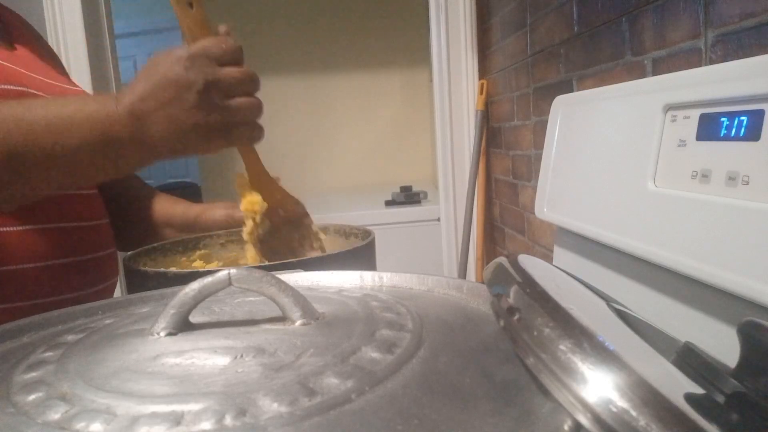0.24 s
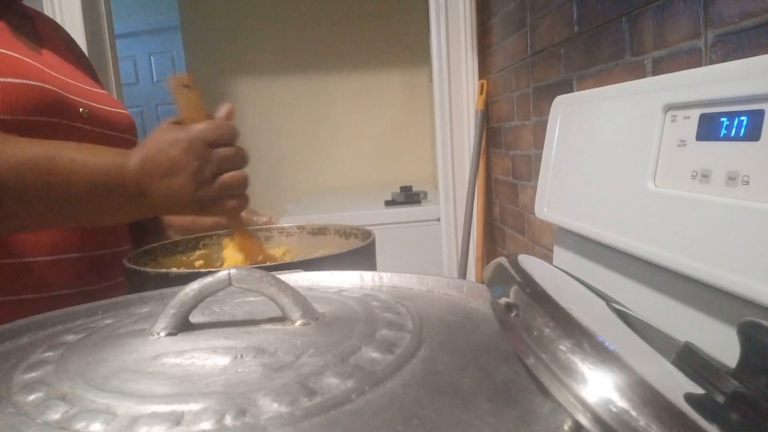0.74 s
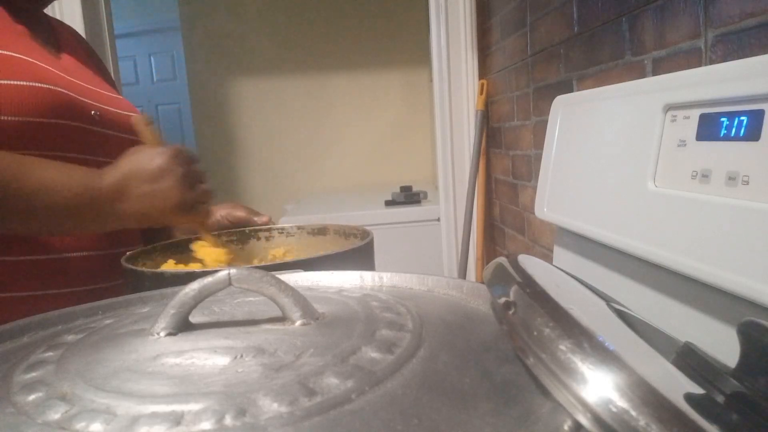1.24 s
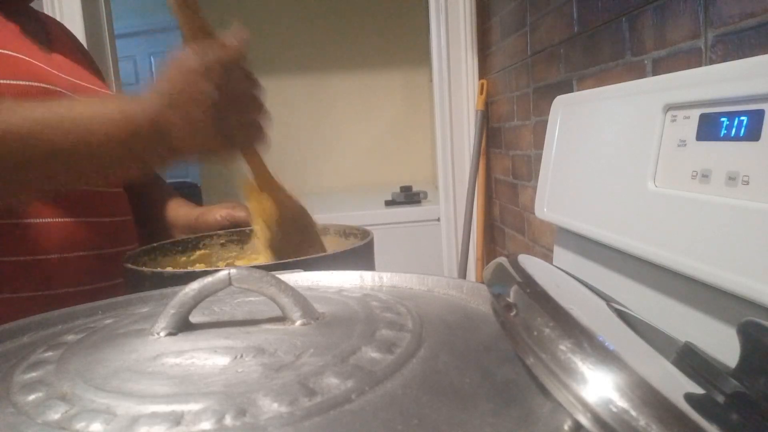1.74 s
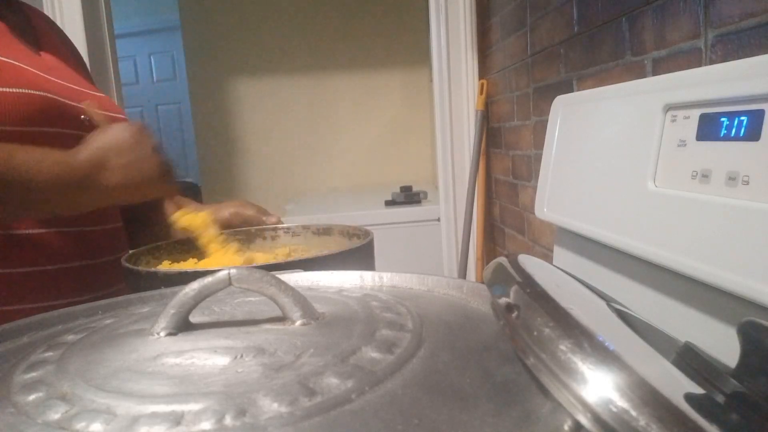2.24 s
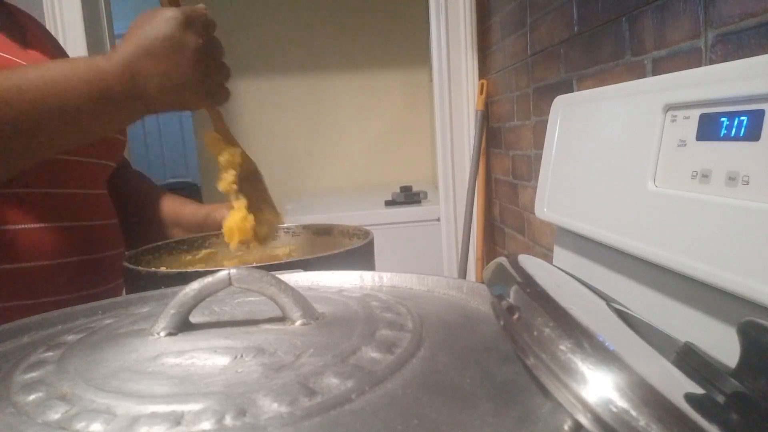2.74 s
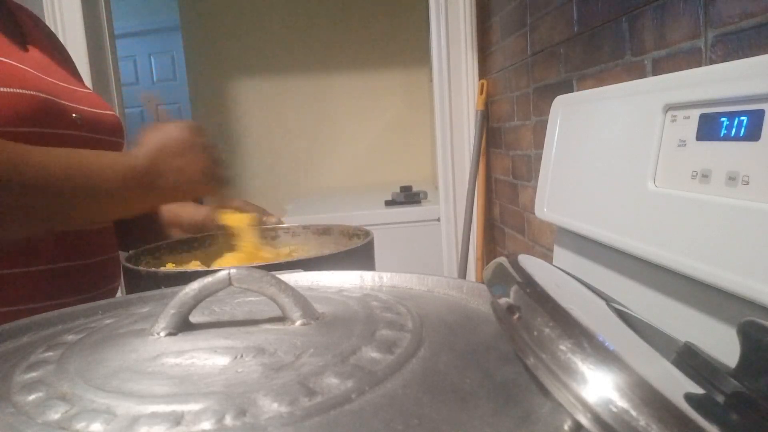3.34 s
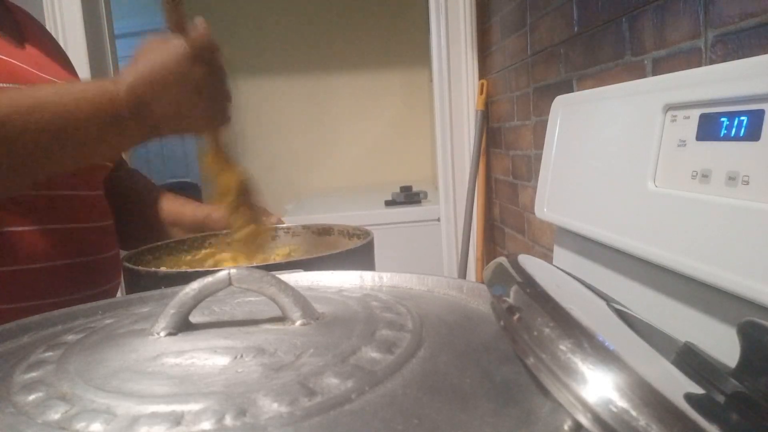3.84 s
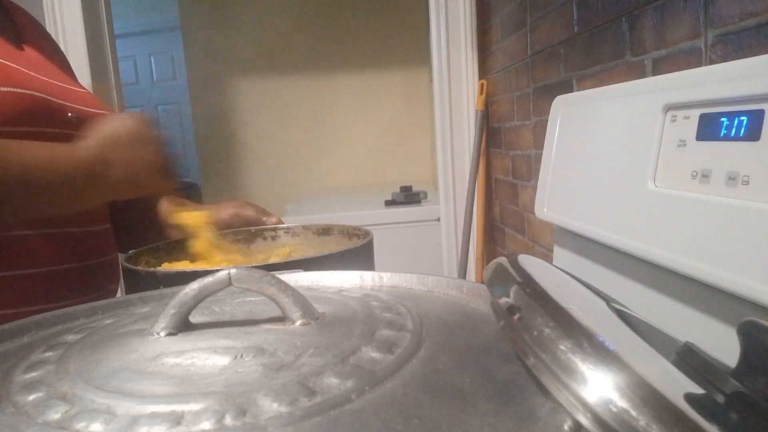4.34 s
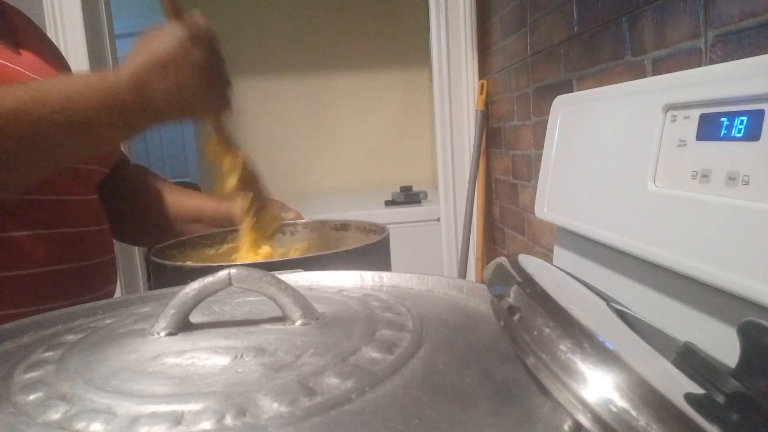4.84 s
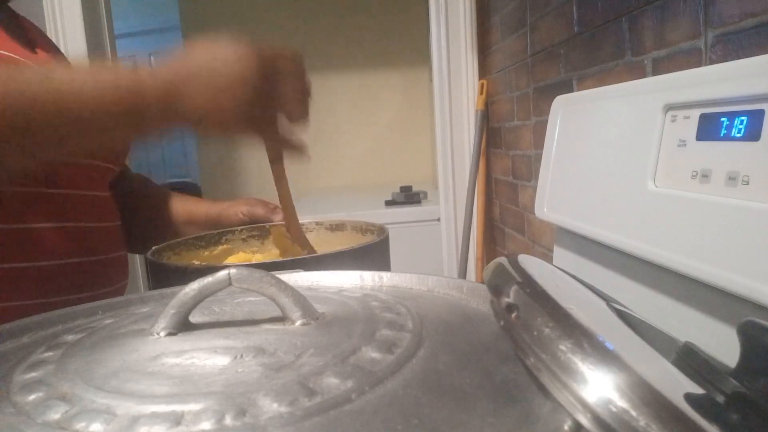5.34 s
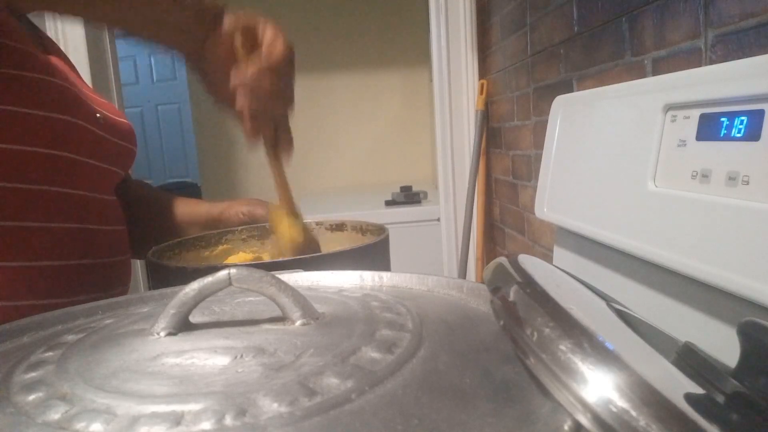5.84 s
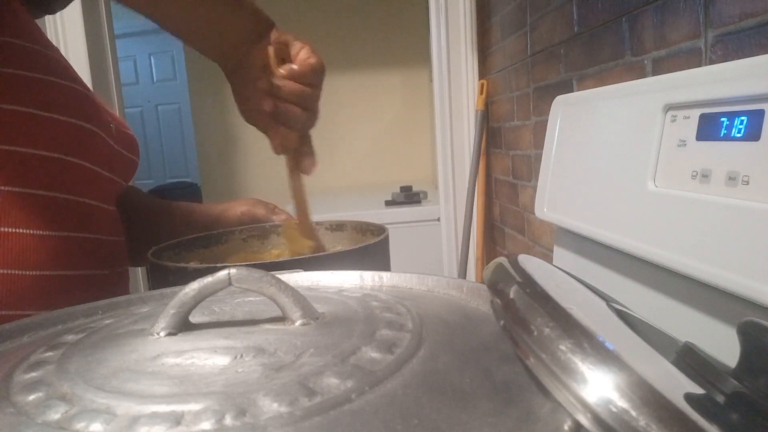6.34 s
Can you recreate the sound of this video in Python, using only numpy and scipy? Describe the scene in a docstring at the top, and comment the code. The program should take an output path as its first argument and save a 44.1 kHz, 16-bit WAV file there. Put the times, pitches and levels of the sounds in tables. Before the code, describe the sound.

A wooden spoon scrapes and knocks in a metal pot of thick cornmeal, with wet slides, dull stove thumps and a faint fan hum.

```python
"""Stirring thick cornmeal

A wooden spoon turns thick cornmeal in a metal pot on a kitchen stove, near a phone with two microphones.
Knocks are bursts of noise that ring the pot; strokes are swelling noise: a rub through the pot, a scrape
and a wet slide. Treble background noise opens up with the sounds, as a phone's noise suppressor lets it through.
Wet wood squeaks, and pushes make the stove boom, both as unsteady tones.
A fan hums in wavering tones and air noise stays steady in the small hard room."""
import sys
import numpy as np
from scipy import signal
from scipy.fft import rfft, irfft
from scipy.io import wavfile
from scipy.ndimage import uniform_filter1d

SR = 44100
rng = np.random.default_rng(int(sys.argv[2]) if len(sys.argv) > 2 else 0)


def ratio_of_db(decibels):
    """Turn decibels (scalar or array-like) into linear amplitude factors; 0 dB maps to 1."""
    return 10 ** (np.asarray(decibels, float) / 20)


def unload_audio(sound):
    """Save the sound as a 16-bit wav file, at the path given as the first command line argument."""
    columns = np.transpose(np.atleast_2d(sound))
    # keep every value between -1 and 1, then stretch to whole-number steps
    steps = np.round(np.clip(columns, -1, 1) * 32767)
    wavfile.write(sys.argv[1], SR, steps.astype(np.int16))


N = 290178  # length in samples

# All levels are relative. The times to rise or fall are the seconds taken for 20 dB.
# The fan's hum. Each row: pitch in Hz, waver of the pitch in Hz, level in dB.
FAN_TONES = [(182.8, 3, -66), (271, 9, -77), (386, 4.05, -70), (484, 6, -73), (535, 7, -81.5),
             (785, 6.7, -73), (1028, 8, -83.5), (1220, 8, -87)]
# Colour of the air noise. Each row: frequency in Hz, level in dB per Hz.
AIR_COLOUR = [(18, -54.5), (30, -23.5), (189, 8), (311, -4), (364, -1), (526, -12), (649, -27.5),
              (760, -12.5), (889, -30), (1220, -17), (1460, -25), (5170, -44), (6550, -28.5),
              (16000, -42.5)]
AIR_DB = -62

# What the pot rings with. Each row: pitch in Hz, level in dB, time to fade by 60 dB in seconds.
POT_MODES = [(220.8, -7.5, 0.15), (282.3, -12, 0.12), (331.8, -6, 0.19), (414.8, 8, 0.043),
             (450.3, -12, 0.12), (523.4, 2.5, 0.08), (568, 1, 0.039), (661, -8, 0.049), (740.5, -7, 0.14),
             (848, -5.5, 0.009), (1043, -10, 0.031), (1163, -12, 0.024), (1234, 7.5, 0.0099),
             (1333, 5, 0.014), (1512, 4, 0.0295), (1715, -4, 0.021), (2012, 3, 0.014), (2240, -9.5, 0.0043),
             (2570, -12.5, 0.011)]
LOW, MIDDLE, HIGH, RASPING = POT_MODES[:5], POT_MODES[5:10], POT_MODES[10:], POT_MODES[16:18]

# The spoon edge scrapes the bottom. Each row: peak in seconds, rise in seconds, fall in seconds,
# level in dB, centre of its colour in Hz.
SCRAPE_STROKES = [(0.0, .05, 0.051, -70, 2660), (.26, 0.1, 0.22, -65, 2360), (.46, .08, .4, -70, 2200),
                  (.64, .4, 0.18, -68.5, 2120), (.74, 0.18, .2, -64.5, 3100),
                  (.85, 0.17, 0.13, -59.5, 3200), (1.17, 0.065, 0.41, -77.5, 2430),
                  (1.45, 0.033, 0.078, -65, 3260), (1.59, 0.18, 0.076, -70.5, 2100),
                  (1.94, 0.052, 0.29, -59, 2160), (2.69, 0.13, .2, -68.5, 2155),
                  (3.371, .4, 0.85, -77, 2270), (3.789, 0.045, 0.082, -70, 2060),
                  (3.901, 0.046, 0.078, -63, 3050), (4.329, .18, 0.17, -78, 2240),
                  (4.66, 0.035, 0.27, -64, 2100), (4.74, 0.11, 0.27, -60, 2020),
                  (4.83, 0.089, .07, -52, 2400), (5.02, 0.12, 0.26, -67.5, 2034),
                  (5.88, .3, 0.24, -75, 2150), (6.2, 0.25, 1, -76, 2400)]
# Colour of the scrape. Each row: frequency as a multiple of the centre, level in dB per Hz.
SCRAPE_COLOUR = [(.4, -32), (.8, 4.5), (1.001, 2), (1.25, -1), (2.2, -7.5), (4.001, -17)]
# Wet slides, and the treble background that opens up with them. Each row: peak in seconds,
# rise in seconds, fall in seconds, slide level in dB, background level in dB.
TREBLE_SWELLS = [(0.0, .05, 0.11, -68, -63.5), (.26, .14, 0.37, -71.5, -63), (.66, .5, .3, -81, -71),
                 (.93, .25, 0.17, -70, -67), (1.13, 0.061, 0.2, -72.5, -73.5), (1.3, .3, 0.25, -76, -82),
                 (1.5, 0.095, 0.16, -68, -64.5), (2.07, 0.12, 0.78, -73, -73.5), (2.38, 1, 0.18, -77, -72),
                 (2.69, 0.12, 0.23, -64.5, -61), (3.3, 0.15, 0.22, -69, -65.5), (3.55, 0.69, .4, -75, -75),
                 (3.8, 0.064, 0.25, -77.5, -70), (3.899, 0.04, 0.081, -63.5, -60.5),
                 (4.2, 0.1, 0.25, -77, -81.5), (4.341, 0.49, 0.24, -75.5, -68.5),
                 (4.7, 0.075, 0.22, -61.5, -61), (4.8, 0.22, 0.046, -62, -68), (4.9, .05, 0.19, -57.5, -68),
                 (5.05, 0.34, 0.71, -67.5, -63.5), (5.45, 0.8, 0.62, -73, -75.5),
                 (5.88, 0.14, 0.19, -78, -67.5), (6.36, 0.47, .4, -67, -67), (6.56, .2, .3, -82, -77)]
# Colour of the wet slide. Each row: frequency in Hz, level in dB per Hz.
SLIDE_COLOUR = [(2600, -19), (4000, -2), (5000, 0), (6000, -3), (8000, -21)]
# Colour of the treble background noise. Each row: frequency in Hz, level in dB per Hz.
BACKGROUND_COLOUR = [(4500, -28), (6800, -6), (9000, -7.5), (12500, -3.5), (13600, -7.5), (16000, -18)]
# How hard the spoon drags the pot. Each row: time in seconds, level in dB.
DRAG_FORCE = [(0, -64.5), (.14, -70), (.5, -70.5), (1.0, -64), (1.08, -67), (1.27, -58.5), (1.68, -69),
              (2.36, -63.5), (2.53, -64), (3.1, -71), (3.3, -47), (3.5, -65), (4.2, -65.5), (4.55, -61),
              (5.0, -58.5), (5.5, -68), (5.75, -63.5), (6.58, -67)]
SCRAPE_REST_DB, TREBLE_REST_DB, RUB_OVER_SCRAPE_DB = -99, -111, 2
# after a knock the pot keeps shuffling on the burner; its level is relative to the knock
SHUFFLE_DB, SHUFFLE_LATE_S, SHUFFLE_RISE_S, SHUFFLE_FALL_S = -22.5, 0.041, 0.088, 0.17

# Wet wood squeaks on metal. Each row: start in seconds, length in seconds, pitch in Hz, level in dB,
# pitch wobble as a share of the pitch.
WOOD_SQUEAKS = [(.185, .06, 2480, -63, .03), (.195, .05, 2150, -64, .03), (.422, .03, 5400, -69, .025),
                (4.63, .075, 5550, -68, .02), (5.075, .07, 12700, -70, .008), (5.08, .05, 11700, -70, .008),
                (5.115, .05, 9700, -69, .015), (5.225, .04, 12400, -66, .008),
                (5.36, .065, 12100, -65, .004), (5.399, .035, 4180, -60, .007),
                (5.416, .036, 5060, -61, .008), (5.432, .03, 4080, -66, .015),
                (5.438, .036, 4680, -60, .007), (5.461, .028, 4070, -57, .005),
                (5.49, .017, 4120, -56, .005), (5.505, .04, 4130, -66, .012), (6.5, .07, 10400, -69, .012)]
SQUEAK_CLIMB, SQUEAK_FLUTTER_DB = 2.5, 3.0  # the climb is counted in wobbles per squeak

# Knocks on the pot. Each row: start in seconds, pot body level in dB, pot wall level in dB,
# tick level in dB, basic chatter time to fade by 60 dB in seconds.
POT_KNOCKS = [(0.213, -72, -75, -69, 0.11), (0.426, -46.5, -62, -94, 0.2), (0.635, -52, -84, -83, 0.23),
              (0.784, -63, -55, -71, 0.12), (0.851, -47.5, -65, -68, 0.12), (0.924, -62, -58.5, -82, 0.093),
              (0.943, -69, -72, -62, 0.08), (1.101, -70, -90, -65, 0.27), (1.367, -44.5, -63, -84, 0.097),
              (1.425, -44, -63, -95, 0.16), (1.473, -54, -54.5, -53, 0.055), (1.892, -31, -34, -51, 0.064),
              (1.906, -21.5, -31.5, -51, 0.061), (1.93, -53, -35, -53.5, 0.12),
              (2.187, -43, -65.5, -80, 0.13), (2.376, -77, -81, -62.5, 0.092),
              (2.507, -36.5, -69.5, -104, 0.1), (2.529, -42, -73, -93, 0.076),
              (2.61, -38.5, -60, -78, 0.082), (2.632, -66, -52, -69, .12),
              (2.656, -43.5, -52.5, -75, 0.096), (2.692, -37, -47.5, -99, 0.081),
              (2.811, -47, -57.5, -90, 0.049), (3.193, -33.5, -36.5, -46.5, 0.15),
              (3.211, -23.5, -36.5, -58, .1), (3.228, -45, -33.5, -55, 0.19),
              (3.285, -47, -37.5, -57, .052), (3.343, -64, -43.5, -60, 0.054), (3.804, -59, -67, -67, 0.15),
              (3.861, -68, -73, -63, 0.26), (3.942, -54, -56.5, -65.5, 0.062),
              (4.148, -44.5, -77, -84, 0.061), (4.191, -40.5, -63, -106, 0.11),
              (4.617, -30, -55, -90.5, 0.14), (4.655, -39.5, -55, -89.5, 0.16),
              (4.722, -30.5, -54, -76, 0.082), (4.835, -13, -20.5, -30, 0.088),
              (4.845, -19.5, -28.5, -46, 0.17), (4.894, -60, -34, -59.5, 0.051),
              (5.21, -42, -47.5, -89, 0.092), (5.22, -59.5, -75, -54.5, 0.074),
              (5.262, -42.5, -45.5, -70, 0.058), (5.843, -56, -72, -64, .09),
              (5.872, -48.5, -50, -74.5, 0.27), (5.971, -49, -49.5, -72.5, 0.048),
              (6.249, -47, -76.5, -69, 0.074)]
# Colour of the crack in a knock. Each row: frequency in Hz, level in dB per Hz.
CRACK_COLOUR = [(1000, -16), (2400, 2.5), (3300, 6), (4200, 5), (5600, 4.5), (6800, -4), (9000, -22.5)]
# Colour of the sizzle in a knock. Each row: frequency in Hz, level in dB per Hz.
SIZZLE_COLOUR = [(4500, -33), (7000, 0), (10000, -3), (12500, -1.5), (14000, -8.5), (16000, -19.5)]
# the middle modes lie between body and wall, the crack between wall and tick
MIDDLE_SHARE, MIDDLE_DB, CRACK_SHARE, CRACK_DB = 0.14, -2.5, 0.61, 0.5
LUMPS_DB = 2.5

# Stove frame, then top panel. Each row: pitch in Hz, waver of the pitch in Hz.
STOVE_TONES = [(70, 5.0), (118, 4.34)]
# Pushes and knocks rock the stove. Each row: peak in seconds, fall in seconds,
# frame thud level in dB, top panel level in dB.
STOVE_SHOVES = [(.31, 0.19, -65, -55), (.49, 0.22, -60, -56), (.73, 0.12, -67, -48.5),
                (.86, 0.072, -55, -47.5), (.95, 0.21, -67, -55), (1.34, 0.09, -61, -50),
                (1.46, .1, -52.5, -55), (1.6, 0.24, -76, -62.5), (1.96, 0.16, -68, -41),
                (2.02, 0.089, -49, -47.5), (2.23, 0.034, -52, -51.5), (2.44, 0.079, -61, -58),
                (2.53, .1, -62, -48), (2.66, 0.26, -50, -47.5), (2.77, .12, -72, -65),
                (3.02, 0.13, -76, -51), (3.22, 0.16, -55, -40), (3.33, 0.19, -61, -52.5),
                (3.41, 0.1, -67, -48), (3.58, 0.18, -73, -62), (3.73, 0.09, -56, -58),
                (3.79, 0.11, -75, -50), (3.96, 0.09, -83, -58), (4.21, 0.097, -45, -47.5),
                (4.31, .2, -68, -51), (4.43, 0.073, -64.5, -57.5), (4.65, .07, -48.5, -38.5),
                (4.751, 0.044, -51, -32.5), (4.865, 0.051, -24, -30), (4.93, 0.037, -40, -36),
                (4.979, 0.13, -53, -40), (5.2, 0.12, -53, -57), (5.28, .15, -66, -44),
                (5.72, 0.58, -91, -62.5), (6.03, .07, -82, -55), (6.21, 0.11, -88, -63),
                (6.3, 0.14, -68, -56.5), (6.52, .2, -72, -59.5)]
SHOVE_RISE_S, STOVE_REST_DB = 0.048, -85.5

# How long the room's tail lasts. Each row: frequency in Hz, time to fade by 60 dB in seconds.
ROOM_FADE = [(60, 0.41), (400, 0.28), (2000, 0.32), (6000, 0.32), (15000, 0.3)]
ROOM_DB, NEAR_DB, NEAR_T60 = -0.5, -2.5, 0.027  # tail, near scatter, scatter's fade by 60 dB in s
APART_HZ = 627  # around this the two microphones grow from alike to unrelated
LEFT_LOUDER_DB = 1.5


def unit(x):
    """Scale to an rms of 1."""
    return x / np.sqrt(np.mean(x ** 2))


def colour(x, points):
    """Shape a sound by (Hz, dB) points; white noise keeps its rms."""
    hz, db = np.transpose(points)
    f = np.fft.rfftfreq(x.shape[-1], 1 / SR) + 1
    gain = ratio_of_db(np.interp(np.log(f), np.log(hz), db))
    return irfft(rfft(x) * unit(gain), x.shape[-1])


def ring(force, modes):
    """Fading tones set off by a force that is too blunt to reach far above them; white noise keeps its rms."""
    t = np.arange(SR // 2) / SR
    body = np.zeros(len(t))
    for hz, db, t60 in modes:
        fade = np.exp(-np.log(1000) * t / t60)
        body += ratio_of_db(db) * fade * np.sin(2 * np.pi * hz * t)
    blunt = signal.butter(4, 1.35 * modes[-1][0], fs=SR, output="sos")
    body = signal.sosfilt(blunt, body)
    return signal.fftconvolve(force, body / np.sqrt(np.sum(body ** 2)))[:N]


def walk(rate):
    """Random levels held for 1 / rate seconds, then smoothed twice and scaled to an rms of 1."""
    hold = int(SR / rate)
    steps = np.repeat(rng.standard_normal(N // hold + 1), hold)
    return unit(uniform_filter1d(uniform_filter1d(steps, hold), hold)[:N])


def tone(hz, waver_hz, db, flicker_db):
    """A tone of unsteady pitch and level."""
    pitch = hz + waver_hz * walk(20)
    level = ratio_of_db(db + flicker_db * walk(25.1))
    return level * np.sqrt(2) * np.sin(2 * np.pi * np.cumsum(pitch) / SR)


def apart(side):
    """Keep what differs between the microphones: little bass, all treble."""
    f = np.fft.rfftfreq(len(side), 1 / SR)
    power = 0.15 + 0.87 / (1 + (APART_HZ / (f + 1)) ** 3)
    return irfft(rfft(side) * np.sqrt(power), len(side))


def wide(count):
    """Noise for both microphones: alike in the bass, unrelated in the treble."""
    mid, side = rng.standard_normal((2, count))
    difference = apart(side)
    return np.array([mid + difference, mid - difference])


def swells(s, rise, fall, db):
    """One gain curve per event, peaking at s: 20 dB up in rise, 20 dB down in fall; a step every 32 samples."""
    late = np.arange(0, N + 32, 32) / SR - np.asarray(s)[:, None]
    rise, fall = (np.maximum(v * np.ones(len(late)), .01)[:, None] for v in (rise, fall))
    return ratio_of_db(np.asarray(db)[:, None] - 20 * np.where(late < 0, -late / rise, late / fall))


def smooth(steps):
    """A curve of swells, filled in at every sample."""
    return np.interp(np.arange(N), 32 * np.arange(len(steps)), steps)


def fan():
    """Wavering tones of a motor hum."""
    return sum(tone(hz, waver_hz, db, flicker_db=0.5) for hz, waver_hz, db in FAN_TONES)


def air():
    """Steady air noise of the room, as coloured noise."""
    return ratio_of_db(AIR_DB) * unit(colour(wide(count=N), AIR_COLOUR))


def spoon_edge():
    """Loudness and centre pitch of the scraping edge; louder strokes weigh more in the pitch."""
    *shape, hz = np.transpose(SCRAPE_STROKES)
    each = swells(*shape)
    total = each.sum(axis=0)
    centre = smooth(hz @ each / total)
    return smooth(total) + ratio_of_db(SCRAPE_REST_DB), centre


def shuffle():
    """Force of the pot shuffling on the burner: a soft swell after each knock."""
    s, body_db = np.transpose(POT_KNOCKS)[:2]
    each = swells(s + SHUFFLE_LATE_S, SHUFFLE_RISE_S, SHUFFLE_FALL_S, body_db + SHUFFLE_DB)
    return smooth(each.max(axis=0))


def rub(edge):
    """Friction, as rough noise, keeps the pot's modes sounding."""
    s, db = np.transpose(DRAG_FORCE)
    drag = ratio_of_db(np.interp(np.arange(N) / SR, s, db))
    force = drag + ratio_of_db(RUB_OVER_SCRAPE_DB) * edge + shuffle()
    rough = ratio_of_db(1.25 * walk(25)) * rng.standard_normal(N)
    rubbing = ring(force * rough, POT_MODES[:10])
    # the scrape also keeps two of the pot's upper modes rasping
    rasping = ring(ratio_of_db(-9.5) * edge * rng.standard_normal(N), RASPING)
    return rubbing + rasping


def scrape(edge, centre):
    """Edge friction: noise whose colour moves with the centre pitch."""
    f, _, z = signal.stft(wide(count=N), SR, nperseg=512)
    multiple, db = np.transpose(SCRAPE_COLOUR)
    at = centre[np.minimum(256 * np.arange(z.shape[-1]), N - 1)]
    gain = ratio_of_db(np.interp(np.log((f[:, None] + 1) / at), np.log(multiple), db))
    gain = gain / np.sqrt(np.mean(gain ** 2, axis=0))
    noise = signal.istft(z * gain, SR, nperseg=512)[1][:, :N]
    return edge * unit(noise)


def slide_and_background():
    """A wet slide, and treble background noise as a noise suppressor lets it through: both swell together."""
    *shape, slide_db, background_db = np.transpose(TREBLE_SWELLS)
    out = 0
    for db, points in ((slide_db, SLIDE_COLOUR), (background_db, BACKGROUND_COLOUR)):
        level = smooth(swells(*shape, db).sum(axis=0)) + ratio_of_db(TREBLE_REST_DB)
        out = out + level * unit(colour(wide(count=N), points))
    return out


def strokes():
    """The rub of the pot, and a gritty blur of scrape, slide and treble background on both sides."""
    edge, centre = spoon_edge()
    rubbing = rub(edge)
    blur = scrape(edge, centre) + slide_and_background()
    grit = ratio_of_db(1.0 * walk(40))
    return rubbing, grit * blur


def squeaks():
    """Wet wood on metal: short, unsteady whistles that swell, flutter and climb a little."""
    out = np.zeros(N)
    for s, length, hz, db, wobble in WOOD_SQUEAKS:
        n = int(length * SR)
        progress = np.arange(n) / n
        climb = SQUEAK_CLIMB * (progress - .5)
        waver = unit(uniform_filter1d(rng.standard_normal(n), 120))
        pitch = hz * (1 + wobble * (climb + waver))
        flutter = unit(uniform_filter1d(rng.standard_normal(n), size=200))
        swell = np.sin(np.pi * progress ** 0.93) * ratio_of_db(SQUEAK_FLUTTER_DB * flutter)
        i = int(s * SR)
        out[i:i + n] += ratio_of_db(db) * swell * np.sin(2 * np.pi * np.cumsum(pitch) / SR)
    return out


def knocks():
    """A sharp blow, then the pot chattering on the burner, drive the pot's modes, a crack and a sizzle."""
    force = np.zeros((5, N + SR))
    t = np.arange(SR // 4) / SR
    # rows: low, middle and high modes, crack, sizzle; the higher parts start faster
    rise = np.array([[.004], [.002], [.0005], [.0004], [.0004]])  # seconds
    pace = np.array([[1.05], [.95], [.8], [.85], [.7]])  # multiplies the chatter's fade time
    blow = np.array([[.3], [.7], [1.3], [.6], [.6]]) * np.exp(-t / 0.0016)
    for s, body, wall, tick, t60 in POT_KNOCKS:
        middle_db = body + MIDDLE_SHARE * (wall - body) + MIDDLE_DB
        crack_db = wall + CRACK_SHARE * (tick - wall) + CRACK_DB
        parts_db = [body, middle_db, wall, crack_db, tick]
        chatter = rng.standard_normal((5, len(t))) * ratio_of_db(1.9 * rng.standard_normal(len(t)))
        # the pot touches down unevenly, in lumps of a few ms
        lumps = unit(uniform_filter1d(rng.standard_normal(len(t)), size=300))
        chatter = chatter * ratio_of_db(LUMPS_DB * lumps)
        fade = np.exp(-np.log(1000) * t / (pace * max(t60, .01)))
        shape = (fade + blow) * np.minimum(t / rise, 1)
        i = int(s * SR)
        force[:, i:i + len(t)] += ratio_of_db(parts_db)[:, None] * chatter * shape
    low, middle, high, crack, sizzle = force[:, :N]
    ringing = ring(low, LOW) + ring(middle, MIDDLE) + ring(high, HIGH)
    return ringing + colour(crack, CRACK_COLOUR) + colour(sizzle, SIZZLE_COLOUR)


def stove():
    """Frame and top panel boom at their own, unsteady pitch around every shove."""
    s, fall, *parts_db = np.transpose(STOVE_SHOVES)
    out = np.zeros(N)
    for db, (hz, waver_hz) in zip(parts_db, STOVE_TONES):
        level = smooth(swells(s, SHOVE_RISE_S, fall, db).sum(axis=0)) + ratio_of_db(STOVE_REST_DB)
        out += level * tone(hz, waver_hz, db=-0.5, flicker_db=1.36)
    return out


def room(x):
    """Direct sound, scatter off pots and stove back that differs left and right, and a dense fading tail."""
    t = np.arange(SR // 2) / SR
    f, frames, z = signal.stft(wide(count=len(t)), SR, nperseg=512)
    hz, t60 = np.transpose(ROOM_FADE)
    fade_s = np.interp(np.log(f + 1), np.log(hz), t60)[:, None]
    z = z * np.exp(-np.log(1000) * frames / fade_s)
    # the tail takes 9.1 ms to build up
    tail = signal.istft(z, SR, nperseg=512)[1][:, :len(t)] * np.minimum(t / 0.0091, 1)
    scatter = unit(rng.standard_normal(len(t)) * np.exp(-np.log(1000) * t / NEAR_T60))
    near = ratio_of_db(NEAR_DB) * apart(scatter) * np.array([[1], [-1]])
    path = near + ratio_of_db(ROOM_DB) * unit(tail)
    return x + signal.fftconvolve(x[None], path / np.sqrt(len(t)), axes=1)[:, :N]


def scene():
    """Pot and fan through the room, with squeaks, stove boom, blur and air; the stove is nearer the left side."""
    rubbing, blur = strokes()
    both = room(knocks() + rubbing + fan()) + squeaks() + stove() + blur + air()
    return both * ratio_of_db(np.array([[LEFT_LOUDER_DB], [-LEFT_LOUDER_DB]]) / 2)


def top_cut(x):
    """Nothing passes above the cut-off."""
    return signal.sosfilt(signal.butter(12, 16510, fs=SR, output="sos"), x)


def record(dry):
    """The phone drops the deepest bass, below 56 Hz."""
    high_pass = signal.butter(8, 56., "high", fs=SR, output="sos")
    mix = signal.sosfilt(high_pass, dry)
    return top_cut(mix)


dry = scene()
out = record(dry)
unload_audio(out)
```